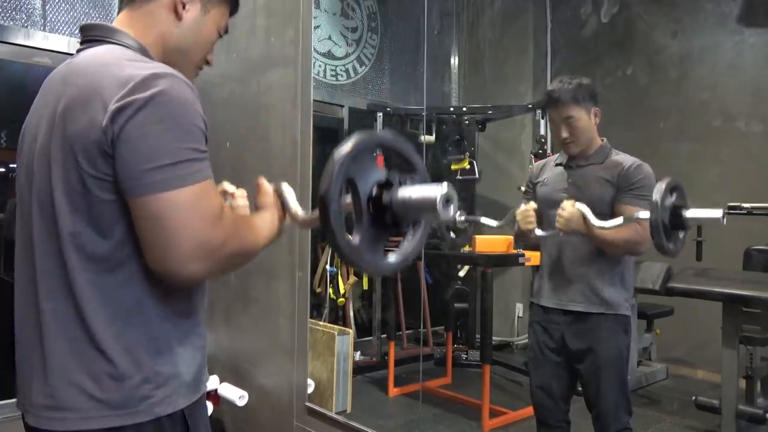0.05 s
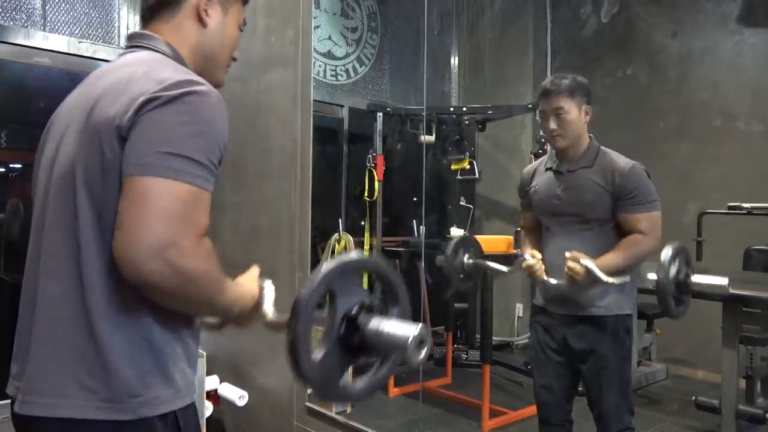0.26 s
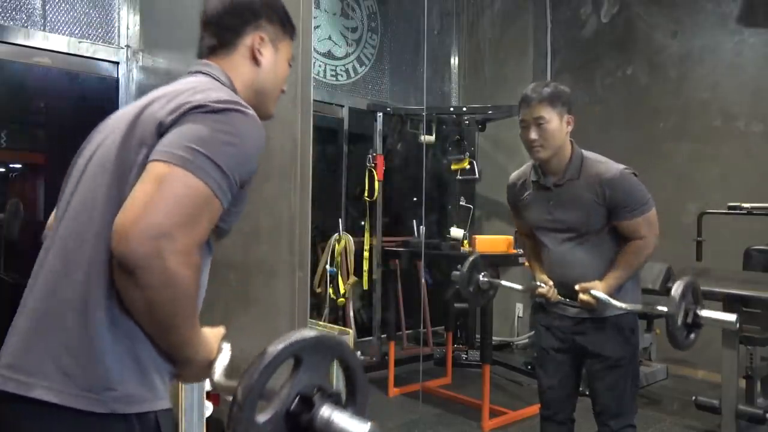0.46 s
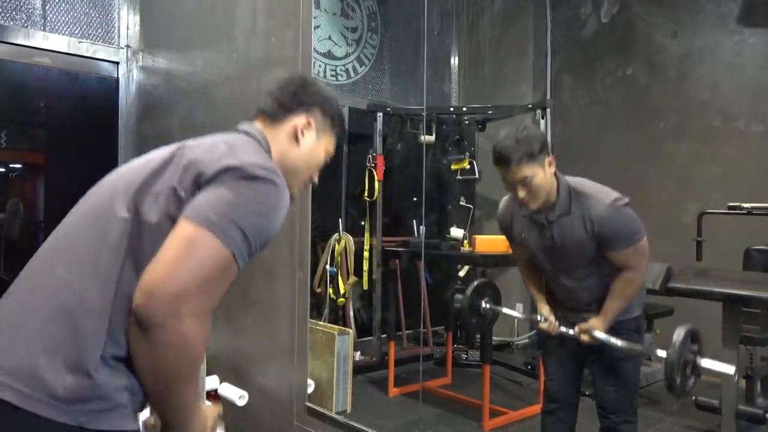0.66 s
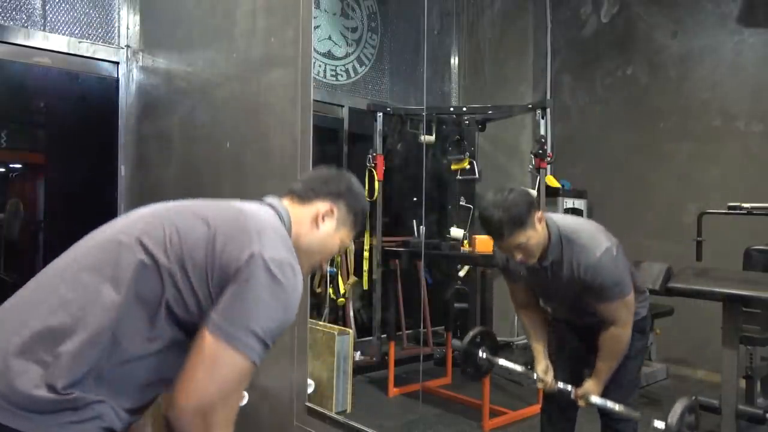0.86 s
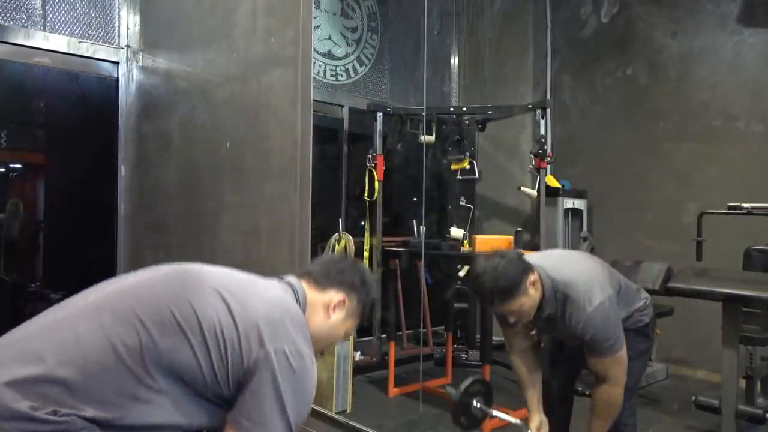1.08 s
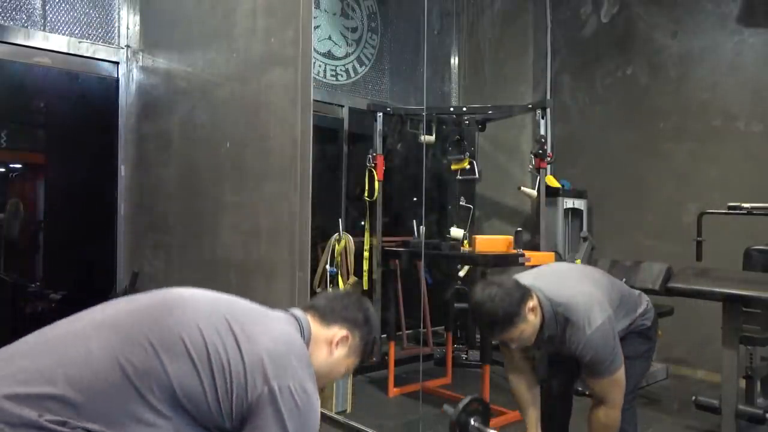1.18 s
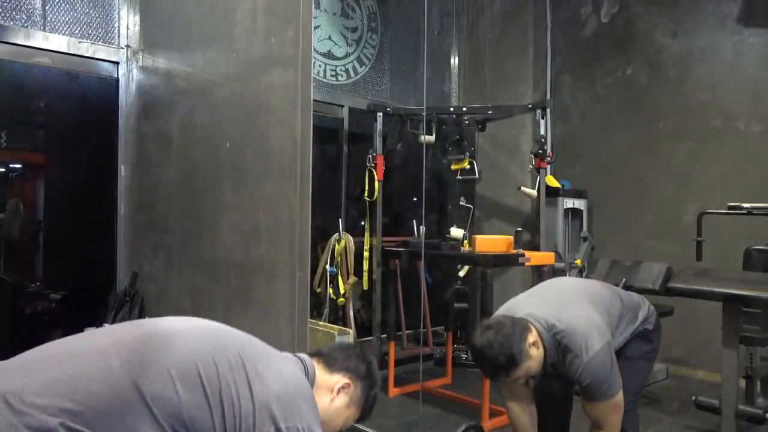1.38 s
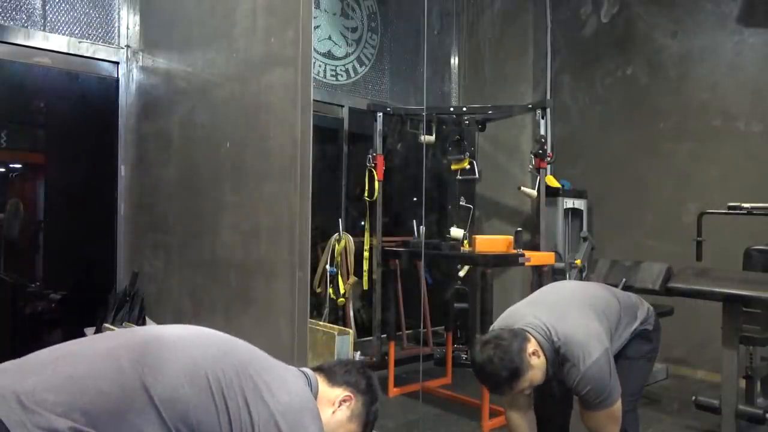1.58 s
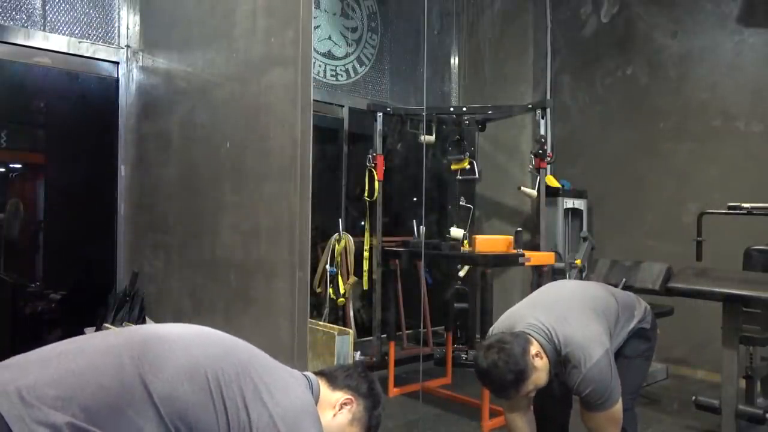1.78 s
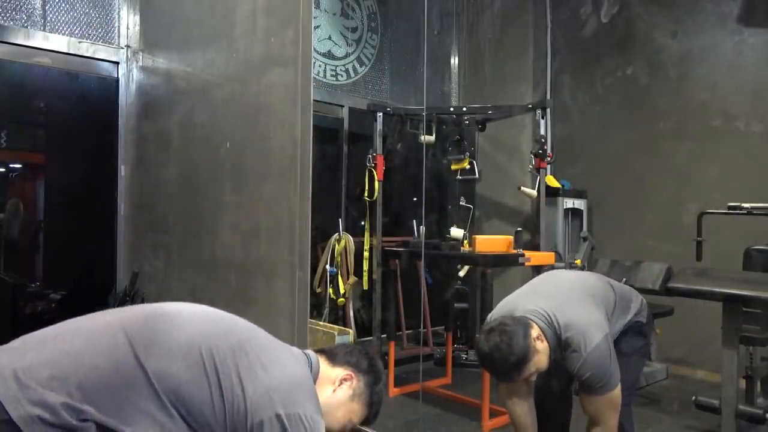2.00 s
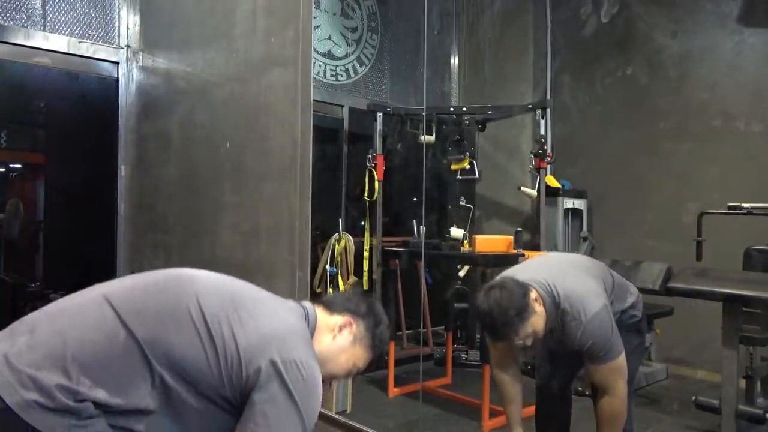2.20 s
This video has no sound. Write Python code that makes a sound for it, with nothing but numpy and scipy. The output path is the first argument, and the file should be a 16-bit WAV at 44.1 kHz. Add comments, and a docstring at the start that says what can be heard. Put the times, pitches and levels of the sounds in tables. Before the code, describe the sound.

Loose iron plates clang and ring as a barbell is put down with a dull thud. Two brief shoe squeaks come first, over soft ventilation hiss in a reverberant, hard-walled gym.

```python
"""A hard-walled gym. A rubber sole squeaks twice by stick-slip friction, then a bar with loose iron
plates is set down. Each end thuds on the mat and the floor booms; the plates clang together and
rattle on the sleeve, ringing in their normal modes, and the room reverberates. Ventilation hisses
behind, and a limiter holds the clangs down."""
import sys
import numpy as np
from scipy import signal
from scipy.fft import rfft, irfft, next_fast_len
from scipy.io import wavfile
from scipy.ndimage import uniform_filter1d, minimum_filter1d, map_coordinates

SR = 44100
rng = np.random.default_rng(int(sys.argv[2]) if len(sys.argv) > 2 else 0)


def to_wav(sig):
    """Store sig (one row per channel, or 1-D mono) as 16-bit WAV at the path in sys.argv[1].

    Samples outside -1..1 are clipped; the rate is SR.
    """
    pcm = np.clip(np.atleast_2d(sig), -1, 1) * 32767
    pcm = np.round(pcm).astype(np.int16)
    wavfile.write(sys.argv[1], SR, pcm.T)  # frames by channels


N = 99092


def amp(db):
    """Decibels as an amplitude ratio."""
    return 10 ** (np.asarray(db) / 20)


def unit_rms(x):
    """Normalisation to a mean power of one."""
    return x / np.sqrt(np.mean(x ** 2) + 1e-20)


def along(points, hz):
    """Interpolation of (Hz, value) points on a logarithmic frequency axis."""
    knots_hz, values = np.transpose(points)
    return np.interp(np.log(hz + 1), np.log(knots_hz + 1), values)


def wobble(rate, size):
    """Smooth random modulation: a spline through `rate` Gaussian knots a second."""
    knots = rng.standard_normal(int(size * rate / SR) + 4)
    return map_coordinates(knots, [np.arange(size) * rate / SR])


def filtered(x, response):
    """Linear filtering: the spectrum of x times a response, given as a function of frequency."""
    size = next_fast_len(len(x) + SR)
    return irfft(rfft(x, size) * response(np.fft.rfftfreq(size, 1 / SR)), size)[:len(x)]


def minimum_phase(points):
    """Folding the cepstrum gives a causal response through the (Hz, dB) points."""
    def response(hz):
        cepstrum = irfft(np.log(amp(np.maximum(along(points, hz), -60))))
        half = len(cepstrum) // 2
        cepstrum[1:half] *= 2
        cepstrum[half + 1:] = 0
        return np.exp(rfft(cepstrum))
    return response


def room(x, wet_db):
    """Reverberation: the direct sound plus a diffuse tail, each frequency decaying at its own rate."""
    # The gym's decay. Each row: frequency in Hz, reverberation time (T60) in seconds.
    decay_times = [(100, 1), (700, 1.02), (2000, 0.87), (4000, 0.6), (8000, 0.4), (14000, 0.53)]
    hz, t, spectrum = signal.stft(rng.standard_normal(3 * SR // 2), SR, nperseg=256)
    decay = amp(-60 * t / along(decay_times, hz)[:, None])
    tail = signal.istft(spectrum * decay, SR, nperseg=256)[1]
    tail = np.pad(tail / np.linalg.norm(tail), (round(0.008 * SR), 0))  # 8 ms after the direct sound
    return x + amp(wet_db) * signal.fftconvolve(x, tail)[:len(x)]


def sole_squeaks():
    """Stick-slip friction makes a harmonic tone; weaker alternate slips add lines between harmonics."""
    # Slides of the sole; the first two merge. Each row: start in seconds, length in seconds, pitch
    # in Hz, glide in Hz per second, level in dB, relative level of the in-between lines in dB,
    # fall per harmonic in dB, pitch flutter in Hz, relative level of the scuff in dB.
    slides = [(-.13, 0.074, 1807, -1500, -26.5, -15, 7, 104, -10),
              (-.05, 0.11, 1633, -200, -20.5, -6, 5, 29, -11),
              (0.653, 0.0888, 1948, 404, -27, -57.5, 13, 12.3, -22)]
    # Spectrum of the scuffing noise. Each row: frequency in Hz, relative level in dB.
    scuff_colour = [(150, -27), (500, -4), (1500, 0), (5000, 1), (9000, -9), (15500, -34)]
    rise_s, fall_s = 0.024, 0.013
    lead = 8820  # samples before time zero, where the first squeak begins
    t = (np.arange(N + lead) - lead) / SR
    out = 0
    for start, length, hz, glide, db, between_db, fall_db, flutter, scuff_db in slides:
        envelope = np.clip((t - start) / rise_s, 0, 1) ** 2
        envelope *= np.clip((start + length - t) / fall_s, 0, 1)
        pitch = hz + glide * np.clip(t - start, 0, length) + flutter * wobble(119.89, len(t))
        half_phase = np.pi * np.cumsum(pitch) / SR  # even multiples are the harmonics
        tone = sum(amp(-fall_db * (k / 2 - 1) + between_db * (k % 2)) * np.sin(k * half_phase)
                   for k in range(2, 14))
        scuff = unit_rms(filtered(rng.standard_normal(len(t)), minimum_phase(scuff_colour)))
        envelope *= amp(db + 2.22 * wobble(60.05, len(t)))
        out = out + room(envelope * (tone + amp(scuff_db) * scuff), wet_db=0)
    return out[lead:]


def ventilation():
    """Moving air makes broadband noise: a hiss above a rumble, each wavering in level."""
    # Course of the noise. Each row: time in seconds, hiss level in dB, rumble level in dB.
    levels = [(0, -57, -45.5), (.25, -47, -44.5), (.42, -43, -44), (.5, -49, -46.5), (0.622, -45.5, -45),
              (.77, -45.5, -46), (0.791, -48.5, -48), (.95, -45.5, -48.5), (1.15, -42, -48.5),
              (1.28, -44.5, -49), (1.286, -52, -58.5), (1.8, -60.5, -50.5), (2.25, -59.5, -56.5)]
    # Spectra of the two bands. Each row: frequency in Hz, relative spectral density in dB.
    hiss_colour = [(800, -40), (1800, -9.5), (3000, -2), (5000, -5), (8200, -3), (10500, -9), (13000, -19),
                   (15500, -24)]
    rumble_colour = [(12, -45), (22, -19), (45, -1), (100, 0), (200, -7.5), (500, -8), (1000, -10.5),
                     (2000, -13), (3200, -46)]
    times, hiss_db, rumble_db = np.transpose(levels)

    def band(colour, course_db, waver_db, rate):
        level_db = np.interp(np.arange(N) / SR, times, course_db) + waver_db * wobble(rate, N)
        noise = filtered(rng.standard_normal(N), lambda hz: amp(along(colour, hz)))
        return amp(level_db) * unit_rms(noise)

    hiss = band(hiss_colour, hiss_db, waver_db=0.34, rate=12.2)
    rumble = band(rumble_colour, rumble_db, waver_db=1.27, rate=9.13)
    return hiss + rumble


def mat_and_floor():
    """Damped oscillation: each end of the bar thuds briefly on the mat, and the floor booms longer."""
    # Landings on the mat. Each row: start in seconds, relative level in dB, frequency in Hz.
    landings = [(1.371, -23.5, 322), (1.551, -9.5, 421)]
    # Booms of the floor. Each row: start in seconds, relative level in dB.
    floor_blows = [(1.397, -17), (1.66, -29.5), (1.744, -32.5)]
    t = np.arange(N) / SR

    def mode(start, db, hz, t60_s, rise_s):
        age = np.maximum(t - start, 0)
        envelope = amp(db - 60 * age / t60_s) * np.minimum(age / rise_s, 1)
        return envelope * np.sin(2 * np.pi * hz * age)

    thuds = sum(mode(start, db + 10.5, hz, t60_s=0.011, rise_s=0.0014) for start, db, hz in landings)
    booms = sum(mode(start, db, hz=84.2, t60_s=0.34, rise_s=0.0069) for start, db in floor_blows)
    return room(thuds, wet_db=-21) + booms


def plate_stack(blows, modes, crash_colour, ring_db, crash_db):
    """Modal response: blows and rattle drive the plates' clear modes and a dense crash of small ones."""
    contact_t60_s, rattle_t60_s, crash_t60_s = 0.0031, 0.23, 0.17
    ticks_per_s, rattle_db, spread_db = 260, -8.5, 5.5
    t = np.arange(N) / SR
    force, shake = np.zeros(N), np.zeros(N)
    for start, db in blows:
        age = np.maximum(t - start, 0)
        force += (t >= start) * amp(db - 60 * age / contact_t60_s) * rng.standard_normal(N)
        shake += (t >= start) * amp(db + rattle_db - 60 * age / rattle_t60_s)
    ticks = (rng.random(N) < ticks_per_s / SR) * amp(spread_db * rng.standard_normal(N))
    force += shake * ticks * rng.choice([-1, 1], N)

    def resonances(hz):
        return sum((-1) ** k * amp(db) * 1j * hz * width / (centre ** 2 - hz ** 2 + 1j * hz * width)
                   for k, (centre, width, db) in enumerate(modes))

    ring = filtered(force, resonances)
    # Modes too close to tell apart respond like decaying noise.
    dense_modes = amp(-60 * t[:SR // 2] / crash_t60_s) * rng.standard_normal(SR // 2)
    crash = signal.fftconvolve(force, dense_modes / np.linalg.norm(dense_modes))[:N]
    crash = filtered(crash, minimum_phase(crash_colour))
    return room(amp(ring_db) * ring + amp(crash_db) * crash, wet_db=-1.5)


def bar_clangs():
    """Impact excitation: the loose plates collide at one end of the bar, then at the other."""
    # Collisions at each end. Each row: start in seconds, relative force level in dB.
    first_blows = [(1.382, 13.5), (1.415, 9), (1.47, 1), (1.505, 1.5)]
    second_blows = [(1.556, 12), (1.636, 13), (1.711, 9), (1.778, 2), (1.843, -1)]
    # The plates' clear modes. Each row: frequency in Hz, bandwidth in Hz, relative gain in dB.
    first_modes = [(2470, 23, -7), (3363, 45, -9), (3756, 37, -7), (4517, 90, -2), (5330, 23, -3),
                   (5854, 40, -3.5), (6140, 44, -10), (6524, 60, -1), (8060, 32, 2), (8100, 45, -8.5),
                   (8400, 34, -4.5), (8830, 27, -13), (9800, 27, -14), (10110, 41, -16)]
    second_modes = [(2380, 55, -5), (3734, 64, -7), (3992, 72, -5.5), (4226, 98, -9.5), (4488, 63, -2),
                    (5200, 17, -2), (5310, 19, -19), (5926, 17, -1), (6170, 30, -6), (6500, 24, 0.5),
                    (6920, 19, -10.5), (7784, 33, -6.5), (7960, 37, -8), (8290, 26, -13), (8490, 52, -12.5),
                    (8700, 47, -14.5), (9200, 27, -25), (9760, 25, -15.5), (10320, 46, -20),
                    (15100, 31, -45)]
    # Spectra of the dense small modes. Each row: frequency in Hz, relative gain in dB.
    first_crash = [(200, -26), (500, -17.5), (1000, -9.5), (3400, -9.5), (4700, 1), (5700, -7),
                   (6600, -4.5), (7200, -17), (8200, -4), (9200, -13), (10200, -16), (13500, -33),
                   (15500, -38)]
    second_crash = [(200, -24.5), (500, -17.5), (1000, -13), (2400, -10.5), (3000, -8.5), (4400, -1),
                    (5500, -9), (6500, 4), (7300, -16.5), (8200, -21), (10200, -23), (13000, -38.5),
                    (15500, -34)]
    return (plate_stack(first_blows, first_modes, first_crash, ring_db=26, crash_db=16)
            + plate_stack(second_blows, second_modes, second_crash, ring_db=28, crash_db=14.5))


def scene():
    """Superposition: the sources add in one channel."""
    return (sole_squeaks() + bar_clangs() + mat_and_floor() + ventilation())[None]


def record(dry):
    """Peak limiting with look-ahead and a steady release, then two brief dips and a band limit."""
    # The level dips briefly. Each row: centre in seconds, width in seconds, gain at the centre in dB.
    dips = [(0.7838, 0.006, -19), (1.284, 0.0057, -15)]
    ceiling_db, release_db_per_s, top_hz = -1.5, 211, 15650
    ahead = smooth = round(0.002 * SR)  # 2 ms each
    x, t = dry[0], np.arange(N) / SR
    over_db = 20 * np.log10(np.abs(x) + 1e-9) - ceiling_db
    held_db = np.maximum.accumulate(over_db + release_db_per_s * t) - release_db_per_s * t
    gain_db = minimum_filter1d(-np.maximum(held_db, 0), 2 * ahead + 1)
    gain_db = uniform_filter1d(gain_db, smooth)
    gain_db += sum(db * np.exp(-(2 * (t - centre) / width) ** 2) for centre, width, db in dips)
    return filtered(x * amp(gain_db), lambda hz: hz < top_hz)[None]


dry = scene()
out = record(dry)
to_wav(out)
```